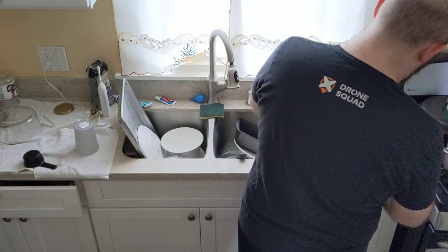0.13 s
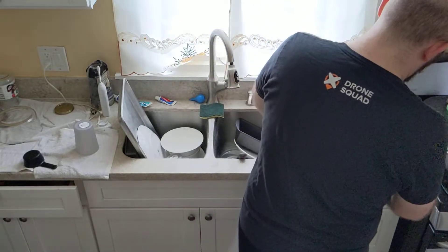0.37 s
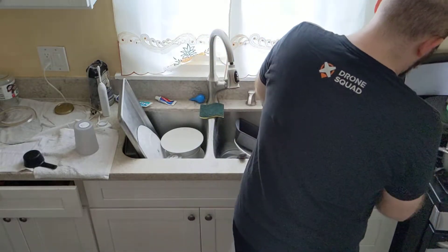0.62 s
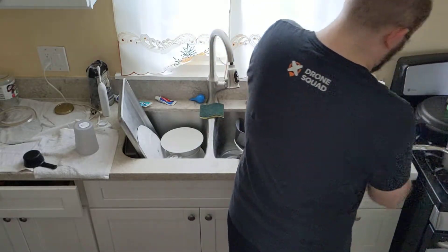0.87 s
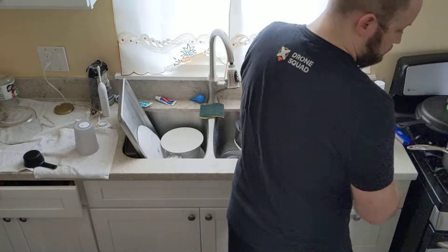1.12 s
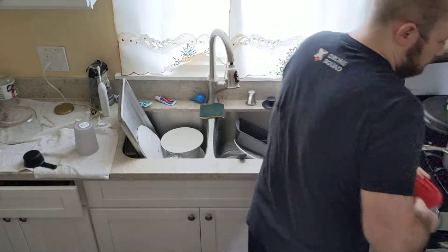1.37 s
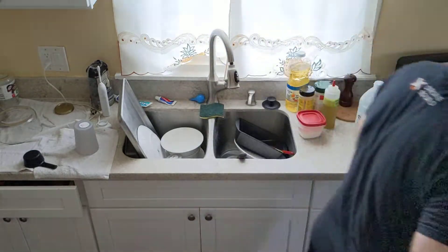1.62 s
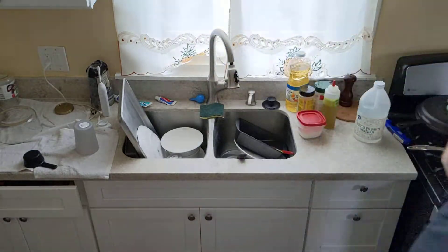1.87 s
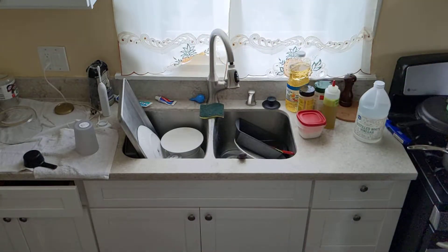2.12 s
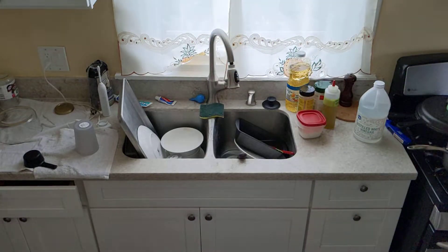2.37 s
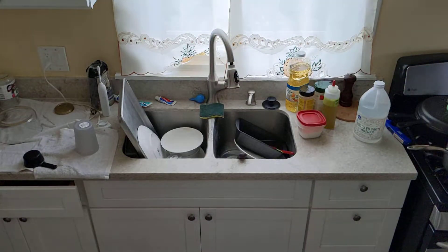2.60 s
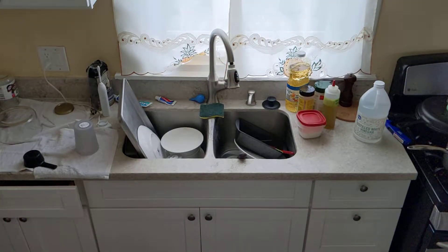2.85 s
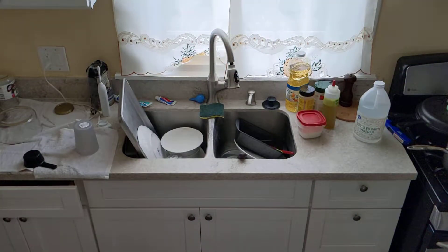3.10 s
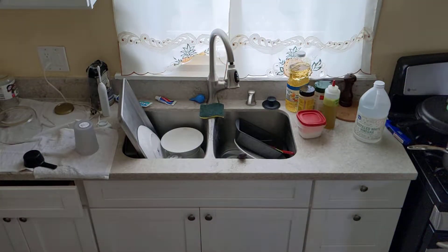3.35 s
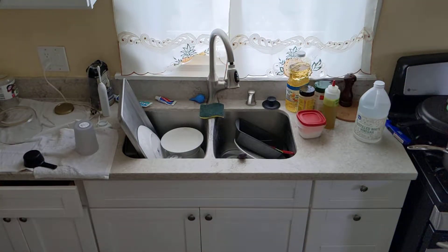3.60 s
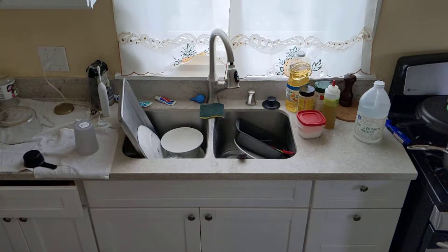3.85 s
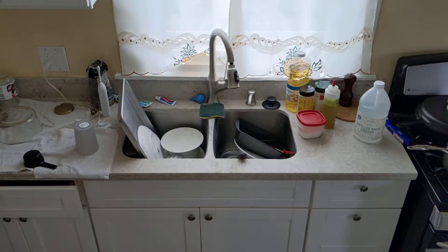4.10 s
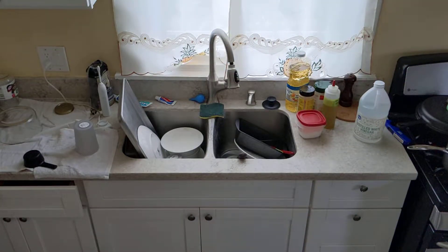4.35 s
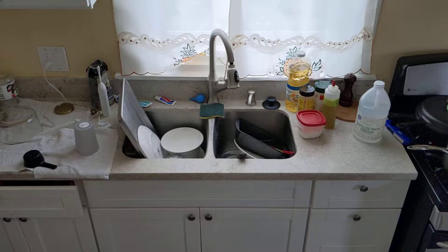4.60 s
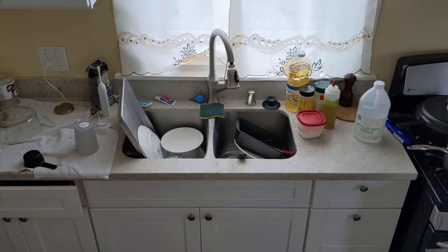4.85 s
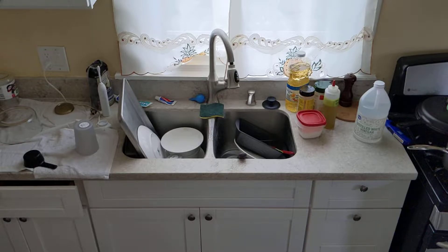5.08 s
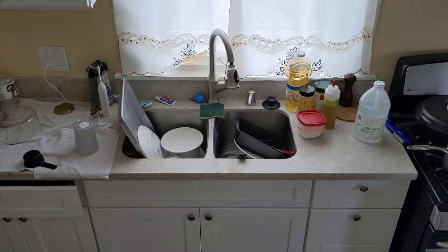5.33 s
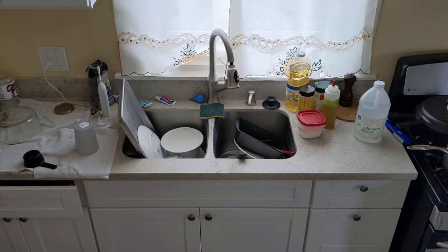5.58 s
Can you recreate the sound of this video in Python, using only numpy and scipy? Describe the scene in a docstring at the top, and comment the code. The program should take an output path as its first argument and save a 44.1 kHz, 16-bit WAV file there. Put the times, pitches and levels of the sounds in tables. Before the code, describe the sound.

A quiet, small, hard-walled kitchen with a faint low house hush, heard in stereo. At the very start a small container knocks and something slides; near 0.1 s come more knocks and a faint glassy jar clink. Light taps follow, and a barely audible thin squeak wavers from 0.5 to 0.7 s. At about 0.8 s a drawer slams: a sharp, loud wooden crack with quick rebounds and a bright rattle. Cloth rustles and slippers scuff at 1.1 s, then short hollow knocks at 1.7, 2.0 and 2.1 s. A weighty floorboard boom, soft thumps and a knock fall around 2.2 to 2.4 s. After light rubbing, cupboard panels thump from 3.3 s, firmest near 3.7 s with a scraping slide. From 3.9 to 5 s only rustles, scuffs and a faint tap remain. Low thuds resume at 5.1 s, cluster loudly with dragging at 5.25 to 5.4 s, and end with heavy thumps near 5.7 s.

```python
"""Small hard-walled kitchen, two spaced microphones, house air throughout: shelf goods slide (coloured grains),
boards boom and panels rumble (bass noise), small containers knock and a jar clinks (decaying modes).
Cloth and slippers rub, a thin squeak slips (wavering tone, breathy band); a drawer by the sink slams (modes, clicks).
The person steps away and handles a low cupboard, whose panels thump at a few low modes.
Each drawer, cupboard or container contact also sends a noise click through the room."""
import sys
import numpy as np
from scipy import signal
from scipy.fft import rfft, irfft, next_fast_len
from scipy.io import wavfile
from scipy.ndimage import uniform_filter1d

SR = 44100
rng = np.random.default_rng(int(sys.argv[2]) if len(sys.argv) > 2 else 0)


def inscribe(sig):
    """Save sig as 16-bit PCM at rate SR to the path in sys.argv[1].

    A 1-D sig is mono; a 2-D sig holds one channel per row.
    Samples are clipped to [-1, 1] before scaling.
    """
    pcm = np.round(np.clip(np.atleast_2d(sig).T, -1, 1) * 32767)
    wavfile.write(sys.argv[1], SR, pcm.astype(np.int16))


def how_loud(loudness_db):
    """Turn decibels into a plain amplitude multiplier (0 dB gives 1, 20 dB gives 10)."""
    steps = np.asarray(loudness_db, float) / 20
    return 10 ** steps


N = 251811
T = np.arange(N) / SR
HZ = np.maximum(np.arange(N // 2 + 1) * SR / N, 1.)


def on_hz(table, hz=HZ):
    """Read a (frequency [Hz], value) table on a log-frequency axis."""
    f, v = np.transpose(table)
    return np.interp(np.log(hz), np.log(f), v)


def colour(x, table):
    """Filter by a (frequency [Hz], level [dB]) spectrum; padded so that the end does not fold onto the start."""
    size = next_fast_len(N + 8192)
    hz = np.maximum(np.arange(size // 2 + 1) * SR / size, 1.)
    return irfft(rfft(x, size) * how_loud(on_hz(table, hz)), size)[..., :N]


def unit(x):
    """Scale to rms 1."""
    return x / np.sqrt(np.mean(x ** 2))


# left-right likeness of diffuse sound: (frequency [Hz], likeness [0-1])
LIKENESS = [(60, 1), (130, 0.98), (290, 0.76), (640, 0.21), (1400, 0), (15000, 0)]


def pair(length):
    """Left and right noise, alike in the bass and unrelated in the treble as in a diffuse field."""
    like = np.clip(on_hz(LIKENESS), 0, 1)
    mid, side = rfft(rng.standard_normal((2, length)), N)
    mid = mid * np.sqrt((1 + like) / 2)
    side = side * np.sqrt((1 - like) / 2)
    return irfft(np.array([mid + side, mid - side]), N)[:, :length]


def walk(rate_hz):
    """Random values drawn at a rate and joined by ramps; spread about 0.6."""
    hold = int(SR / rate_hz)
    draws = rng.standard_normal(N // hold + 1)
    return 0.71 * uniform_filter1d(np.repeat(draws, hold), hold)[:N]


def add(track, s, piece):
    """Mix a piece into a track from time s."""
    i = int(s * SR)
    n = min(piece.shape[-1], N - i)
    track[..., i:i + n] += piece[..., :n]


def slices(spectrum):
    """Overlapping slices half an octave apart, with their centres; they sum flat in power."""
    for hz in 250 * 2 ** np.arange(0, 6.1, .5):
        weight = np.cos(np.pi * np.clip(np.log2(HZ / hz), -.5, .5))
        yield hz, irfft(spectrum * weight, N)


def patchy(patch_db, rate_hz):
    """Stereo noise whose slices swell and sink on their own, as uneven grains do."""
    return sum(band * how_loud(patch_db * walk(rate_hz)) for hz, band in slices(rfft(pair(N))))


def swells(rows, rest_db=-120):
    """One envelope per dB column: each motion climbs to its peak and falls at its own pace; powers add."""
    swell_db = 15  # climb within the rise time, drop within the fall time
    power = how_loud(2 * rest_db)
    for s, rise_s, fall_s, *db in rows:
        before = (s - T) / max(rise_s, .002)
        after = (T - s) / max(fall_s, .002)
        below_db = swell_db * np.maximum(before, after)
        power = power + how_loud(2 * np.array(db))[:, None] * how_loud(-2 * below_db)
    return np.sqrt(power)


def ring(modes, favour_hz, rise_s, focus_db=9.5, turn_rad=0.13):
    """Decaying modes of alternating sign; the spot struck favours those near one pitch; the left lags."""
    left_lag_ms = 0.09  # the work is nearer the right microphone
    t = T[:SR // 2, None]
    hz, db, t60_s = np.transpose(modes)
    # no two blows are quite alike
    chance_db, chance_rad = rng.standard_normal((2, len(hz))) * np.array([[1.], [.3]])
    db = db + chance_db - focus_db * np.log2(hz / favour_hz) ** 2
    sign = (-1.) ** np.arange(len(hz))
    lag_rad = np.array([1, 0])[:, None, None] * (turn_rad + 2 * np.pi * hz * left_lag_ms / 1000)
    decay = how_loud(db - 60 * t / t60_s)
    y = sign * decay * np.sin(2 * np.pi * hz * t + chance_rad - lag_rad)
    return y.sum(axis=2) * (1 - np.exp(-t[:, 0] / rise_s))


# steady air of the house: (frequency [Hz], density [dB per Hz])
HUSH_SPECTRUM = [(15, -33.5), (25, 11), (58, 5), (130, -1.5), (235, -6.5), (542, -26.5), (655, -47.5),
                 (770, -16), (1290, -19.5), (6330, -23.5), (12400, -37.5), (15800, -40)]


def hush():
    """Steady coloured noise: the air of the house."""
    return unit(colour(pair(N), HUSH_SPECTRUM)) * how_loud(-60)


# weight put on the floorboards: (peak [s], rise [s], fall [s], boom [dB])
FOOTSTEPS = [(.93, .25, .4, -56.5), (1.4, .4, .3, -58), (1.65, .4, 0.33, -54), (1.85, 0.27, .15, -51.5),
             (1.96, .15, .1, -58.5), (2.19, 0.11, .1, -53.5), (2.32, .04, .15, -34.5), (2.42, .1, .12, -46),
             (2.91, .12, .24, -46), (3.29, .3, .2, -51), (3.42, .2, .1, -49.5), (3.67, .06, .04, -40.5),
             (3.86, .06, .25, -42.5), (4.48, .2, .18, -48), (4.94, .4, .4, -57), (5.29, .05, .07, -50.5),
             (5.42, .1, .06, -61), (5.7, 0.2, .1, -46.5)]


def floorboards():
    """Weight shifts swell a low noise boom; the boards are never quite still."""
    boom = colour(pair(N), [(25, -32), (42, 3), (56, 15), (85, -15), (120, -36.5)])
    return unit(boom) * swells(FOOTSTEPS, rest_db=-66)


# things slid about on shelves: (peak [s], rise [s], fall [s], drag [dB], panel rumble [dB])
SHELF_SLIDES = [(0.001, 0.023, 0.074, -53, -41.5), (.37, 0.17, 0.54, -63, -58),
                (.68, 0.41, 0.25, -64.5, -58), (.89, .1, 0.084, -49, -45), (1.16, 0.44, 0.15, -59.5, -57),
                (1.7, 0.24, .2, -57.5, -53), (2.05, .07, 0.079, -56.5, -52),
                (2.27, 0.066, 0.098, -47.5, -59), (2.33, 0.1, 0.11, -65, -45), (2.42, .1, 0.17, -57, -56.5),
                (2.8, 0.093, 0.15, -58.5, -53.5), (2.91, 0.26, 0.4, -66, -62),
                (3.35, 0.44, 0.18, -61.5, -55), (3.56, 0.19, 0.27, -53.5, -47),
                (3.74, 0.085, 0.11, -39, -61), (3.86, 0.19, 0.089, -64, -41.5),
                (4.09, 0.24, 0.051, -75, -54), (4.48, 0.38, 0.15, -65.5, -55), (4.8, .2, 0.27, -82, -68),
                (4.94, 0.5, 0.04, -56, -55), (5.15, .02, .25, -57, -44), (5.26, 0.17, 0.027, -47, -41),
                (5.34, 0.046, 0.12, -36.5, -80), (5.42, .1, 0.038, -43.5, -62), (5.47, .05, 1, -63, -56)]
# drag noise: (frequency [Hz], density [dB per Hz])
DRAG_SPECTRUM = [(200, -19.5), (380, -1.5), (650, -6), (1200, -15), (1900, -46)]


def sliding(grains):
    """Grains of dragging, with low panels set humming by the same motion."""
    drag_level, hum_level = swells(SHELF_SLIDES, rest_db=-76)  # never quite still
    drag = unit(colour(grains * how_loud(2.2 * walk(67)), DRAG_SPECTRUM))
    rumble = unit(colour(pair(N), [(80, -33.0), (120, 10.5), (190, -3.0), (300, -6), (420, -40.5)]))
    return drag * drag_level + rumble * hum_level


# small containers set down: (time [s], ring level [dB], ring pitch [Hz], ring t60 [s], clack level [dB])
CONTAINER_KNOCKS = [(0.002, -34, 450, 0.14, -51.5), (0.094, -41, 286, 0.26, -40.5),
                    (0.104, -32.5, 293, 0.17, -64), (0.363, -42, 268, 0.082, -47),
                    (0.54, -43, 264.5, 0.14, -47), (1.032, -39, 212, 0.074, -53),
                    (1.068, -45, 290, 0.14, -58), (1.275, -67, 220, 0.11, -49.5),
                    (1.53, -50.5, 550, 0.1, -59), (1.594, -51, 460, 0.11, -47.5),
                    (1.702, -27, 502, 0.042, -43.5), (1.99, -21, 507, 0.025, -43),
                    (2.072, -31.5, 522, 0.042, -45.5), (2.382, -33, 442, 0.07, -37),
                    (2.767, -46, 220, 0.11, -53), (2.929, -43, 404, 0.089, -70),
                    (4.762, -60, 487, 0.08, -40.5)]
# container modes against the lowest: (pitch [ratio], level [dB], decay [ratio])
CONTAINER_MODES = [(1.002, 2, 0.88), (1.42, -10.5, 0.87), (1.93, -9.5, 0.93), (2.6, -19, 0.94)]


def knocks():
    """Each container rings in scaled copies of one mode set; its clack carries a weaker sizzle."""
    sizzle_db = -16.5  # against the clack
    for s, db, hz, t60_s, clack_db in CONTAINER_KNOCKS:
        modes = [(hz * ratio, db + rel_db, t60_s * decay) for ratio, rel_db, decay in CONTAINER_MODES]
        tone = ring(modes, hz, 0.0023, focus_db=2.0)
        yield s, tone, [-np.inf, -np.inf, clack_db, clack_db + sizzle_db]


# faint clinks of a jar: (time [s], level [dB], pitch [Hz], t60 [s])
JAR_CLINKS = [(0.095, -42, 1440, 0.17), (0.097, -47, 1380, 0.34), (0.096, -46, 2030, 0.12)]


def clinks():
    """Single decaying glass modes, without a contact click."""
    for s, db, hz, t60_s in JAR_CLINKS:
        yield s, ring([(hz, db, t60_s)], hz, 0.002), [-np.inf] * 4


# cloth and slippers rubbing: (peak [s], rise [s], fall [s], rustle [dB], scuff [dB])
CLOTH_RUBS = [(.364, .012, 0.1, -71, -84), (.55, 0.031, 0.42, -60.5, -67.5),
              (1.036, 0.0058, 0.18, -57.5, -57), (1.104, 0.075, 0.11, -48, -49.5),
              (1.324, .15, .14, -60, -62.5), (1.62, 0.043, .1, -52.5, -59.5),
              (1.806, 0.11, 0.051, -54, -61.5), (2.184, 0.074, .025, -56, -61),
              (2.214, 0.01, .15, -58.5, -53), (2.328, 0.053, .06, -45.5, -49),
              (2.386, .008, 0.068, -44, -51), (2.55, 0.22, 0.41, -65, -72.5),
              (2.778, 0.03, 0.075, -56.5, -59.5), (2.918, 0.18, 0.17, -54.5, -61.5),
              (3.252, 0.039, 0.17, -62, -66), (3.323, .003, 0.18, -56, -58), (3.47, 0.12, 0.064, -56, -75),
              (3.566, 0.018, .3, -59, -60), (3.66, 0.009, 0.043, -52, -50), (3.76, 0.018, 0.13, -58, -49),
              (3.9, .15, 0.034, -61, -74), (4.04, 0.037, 0.14, -48.5, -51.5),
              (4.084, 0.06, 0.095, -48, -56), (4.335, 0.041, 0.066, -53, -58.5),
              (4.4, 0.076, 0.21, -67, -58.5), (4.552, 0.19, 0.053, -57, -72), (4.812, 0.039, .11, -53, -53),
              (4.912, 0.045, 0.033, -76, -61), (5.06, .16, 0.09, -59.5, -61),
              (5.19, 0.01, 0.16, -54.5, -50.5), (5.262, 0.024, 0.028, -63, -39.5),
              (5.31, .015, 0.088, -68, -46), (5.36, 0.057, 0.054, -49, -45), (5.64, 0.065, 0.09, -66, -66)]
# cloth noise: (frequency [Hz], density [dB per Hz])
RUSTLE_SPECTRUM = [(2060, -9.5), (3500, -12), (3780, -4), (5450, -4.5), (8260, -8), (15800, -23.5)]
# slipper noise: (frequency [Hz], density [dB per Hz])
SCUFF_SPECTRUM = [(800, -17), (1300, -6), (2100, -1), (2800, -0.5), (3600, -11.5), (4500, -44)]


def rubbing(grains):
    """The same grains coloured as cloth and as slippers, each under its own swells."""
    rustle_level, scuff_level = swells(CLOTH_RUBS)
    rustle = unit(colour(grains, RUSTLE_SPECTRUM)) * rustle_level
    scuff = unit(colour(grains, SCUFF_SPECTRUM)) * scuff_level
    return rustle + scuff


def movement():
    """Fine uneven grains feed the sliding and rubbing; floorboards boom below."""
    grains = patchy(3., 30) * how_loud(2.1 * walk(110) + 1.3 * walk(18))
    return floorboards() + sliding(grains) + rubbing(grains)


def during(start_s, end_s):
    """Gate with 68 ms ramps."""
    return uniform_filter1d(1. * (T > start_s) * (T < end_s), size=3000)


def squeak():
    """A faint tone that slips in pitch and strength, with a breathy band above it."""
    pitch_hz = 2050 * (1 + .02 * walk(250))
    waver = how_loud(2.5 * walk(43))
    tone = np.sqrt(2) * np.sin(2 * np.pi * np.cumsum(pitch_hz) / SR)
    tone = tone * how_loud(-69.5) * during(.5, .71)
    air = unit(colour(pair(N), [(4000, -16), (4700, 2.5), (5400, -21)]))
    air = air * how_loud(-71) * during(.54, .69)
    return waver * (tone + air)


# drawer slam and rebounds: (time [s], panel level [dB], favoured pitch [Hz], clack [dB], sizzle [dB])
# the pitch has no effect at zero focus
SLAM_BLOWS = [(0.7715, -21.5, 350, -18, -35), (0.776, -11.5, 250, -15.5, -20.5),
              (0.788, -26.5, 660, -26.5, -33), (0.795, -24, 300, -24.5, -35.5)]
# drawer modes: (frequency [Hz], level [dB], t60 [s])
DRAWER_MODES = [(58, -13, .3), (86, -11, 0.34), (119.8, 2, 0.11), (148.5, -1.5, 0.26), (173, -1, 0.17),
                (195, -5, 0.33), (210, -3, 0.38), (253, -10, 0.2), (279.3, -1, 0.25), (305, 5.5, 0.24),
                (423, -11, .17), (495, -15.5, .24), (595, -6, 0.11), (668, -5, .2), (770, -14, 0.071),
                (920, -12, .18), (1345, -9, .15), (1490, -10, .1)]


def slam():
    """Drawer modes struck hard with a fast rise; front on frame and contents click."""
    for s, db, hz, crash_db, cutlery_db in SLAM_BLOWS:
        tone = ring(DRAWER_MODES, hz, 0.00056, focus_db=0.0) * how_loud(db)
        yield s, tone, [crash_db, cutlery_db, -np.inf, -np.inf]


# cupboard thumps: (time [s], panel level [dB], favoured pitch [Hz], clack [dB], sizzle [dB])
CUPBOARD_THUMPS = [(2.213, -43, 188, -39, -69), (2.233, -35, 57.6, -56, -62), (2.268, -33.5, 56, -51, -66),
                   (2.304, -42.5, 64, -47, -57), (2.391, -51, 60, -61, -66), (3.304, -41, 145, -51, -71),
                   (3.323, -43.5, 261, -51, -53.5), (3.349, -34.5, 75, -45.5, -54.5),
                   (3.391, -55, 70, -77, -55), (3.462, -41, 384, -64, -61), (3.469, -38.5, 140, -61, -57),
                   (3.559, -32, 166.8, -55, -74), (3.585, -36.5, 150, -53, -72),
                   (3.67, -23.5, 163, -41, -38), (3.674, -19.5, 540, -33, -51),
                   (3.7, -21, 141.7, -30.5, -62), (3.727, -28, 141, -32.5, -62),
                   (3.818, -50, 156, -39, -55.5), (5.088, -39.5, 250, -42.5, -48.5),
                   (5.099, -29, 246, -36.5, -42.5), (5.12, -27, 108, -38.5, -49),
                   (5.243, -30, 200.4, -31.5, -58), (5.25, -10.5, 164, -32.5, -70),
                   (5.272, -17, 85.4, -48, -64), (5.266, -25.5, 850, -48, -65),
                   (5.301, -21, 118.3, -32.5, -47.5), (5.31, -35.5, 443, -40, -62),
                   (5.346, -24.5, 156, -35.5, -76), (5.39, -27, 215, -40.5, -75),
                   (5.441, -35.5, 150.3, -47, -73), (5.669, -25.5, 193, -36, -57),
                   (5.679, -15.5, 146, -32.5, -53.5), (5.692, -12.5, 202, -28, -38)]
# cupboard modes: (frequency [Hz], level [dB], t60 [s])
CUPBOARD_MODES = [(56, 2, 0.36), (69, -4, 0.23), (84.4, 1.5, 0.45), (110, -6, 0.22), (147, 3, .22),
                  (168.4, -1.5, 0.26), (208, -1, 0.23), (270, -6, 0.22), (317.4, -5, 0.2), (375, -10, 0.35),
                  (425.6, -9, 0.23), (494, -8, 0.2), (556, 1, 0.13), (702, -8, 0.18), (850, -3, 0.15)]


def thumps():
    """Low panel modes, sharply weighted to the pitch that each blow favours."""
    for s, db, hz, clack_db, hiss_db in CUPBOARD_THUMPS:
        tone = ring(CUPBOARD_MODES, hz, 0.0028, focus_db=13., turn_rad=0.33) * how_loud(db)
        yield s, tone, [-np.inf, -np.inf, clack_db, hiss_db]


# decay of the kitchen: (frequency [Hz], t60 [s])
ROOM_DECAY = [(300, 0.24), (1000, 0.3), (4000, 0.32), (12000, .22)]


def room(x):
    """Diffuse reply of the kitchen: noise that builds in a few ms, its decay set by frequency."""
    t, noise, reply = T[:SR // 2], pair(SR // 2), 0
    for hz in 125 * 2. ** np.arange(8):
        edges_hz = [hz / np.sqrt(2), min(hz * np.sqrt(2), 20000)]
        band = signal.butter(2, edges_hz, "band", fs=SR, output="sos")
        reply = reply + signal.sosfilt(band, noise) * how_loud(-60 * t / on_hz(ROOM_DECAY, hz))
    reply = reply * (1 - np.exp(-t / 0.001))
    reply = reply / np.sqrt(np.sum(reply ** 2) / 2)
    return signal.fftconvolve(x[None], reply, axes=1)[:, :N]


# drawer front on its frame: (frequency [Hz], level [dB])
CRASH_TONE = [(350, -13), (700, -11), (1000, -17.5), (1400, -14.5), (2000, -13.5), (2800, -16.5),
              (4000, -20), (8000, -38.5)]
# contents of the drawer: (frequency [Hz], level [dB])
CUTLERY_TONE = [(2000, -28), (4000, -9), (5600, -5), (8000, -5.5), (11300, -11), (16000, -20)]
# wood on wood: (frequency [Hz], level [dB])
CLACK_TONE = [(250, -18.5), (350, -11), (500, -15), (700, -10.5), (1000, -12.5), (1400, -15.5),
              (2000, -16.5), (2800, -19.5), (4000, -87)]
# loose things jolted: (frequency [Hz], level [dB])
HISS_TONE = [(1000, -24), (2000, -5.5), (2800, -7.5), (4000, -8), (5600, -5.5), (8000, -8.5),
             (11300, -13.5), (16000, -19)]


def echoes(clicks):
    """Contact clicks scattered by the walls: a sharp front, then lumpy noise dying at the room's rate."""
    tones = [CRASH_TONE, CUTLERY_TONE, CLACK_TONE, HISS_TONE]
    front_t60_s = 0.0076
    out = 0
    for hz, band in slices(rfft(pair(N))):
        power = sum(click * how_loud(2 * on_hz(tone, hz)) for click, tone in zip(clicks, tones))
        front = signal.lfilter([1], [1, -how_loud(-120 / (front_t60_s * SR))], power)
        front = front * how_loud(-8.0)  # on power: 4 dB down
        tail = signal.lfilter([1], [1, -how_loud(-120 / (on_hz(ROOM_DECAY, hz) * SR))], power)
        level = np.sqrt(np.abs(uniform_filter1d(front + tail, size=40)))
        out = out + unit(band) * how_loud(0.95 * walk(70)) * level
    return out


def blows():
    """Blows ring panels, containers and glass, direct and through the room; contact clicks fill the room."""
    rings = np.zeros((2, N))
    clicks = np.zeros((4, N))  # power: crash, cutlery, clack, hiss
    for source in (knocks, clinks, slam, thumps):
        for s, tone, click_db in source():
            add(rings, s, tone)
            add(clicks, s, how_loud(2 * np.array(click_db))[:, None])
    return rings * how_loud(-3.5) + room(rings[1] * how_loud(-9.5)) + echoes(clicks)


# microphone balance: (frequency [Hz], left minus right [dB])
BALANCE = [(60, 2.5), (500, 1), (4000, 2.5), (14000, 2)]


def scene():
    """All layers summed; the left microphone gets a little more."""
    left, right = hush() + movement() + squeak() + blows()
    left = colour(left, [(hz, db / 2) for hz, db in BALANCE])
    right = colour(right, [(hz, -db / 2) for hz, db in BALANCE])
    return np.array([left, right])


def roll_off(x):
    """The treble ends steeply here."""
    return signal.sosfilt(signal.butter(12, 15990, fs=SR, output="sos"), x)


# passband, deepest bass dropped and treble ended near 15.75 kHz: (frequency [Hz], level [dB])
PASSBAND = [(25, -24), (45, -6), (70, 0), (15700, 0), (15800, -50)]


def record(dry):
    """The loudest peaks are rounded; the microphone drops the deepest bass; a band limit ends the treble."""
    rounded = np.tanh(0.78 * dry) / 0.8
    return roll_off(colour(rounded, PASSBAND))


dry = scene()
out = record(dry)
inscribe(out)
```